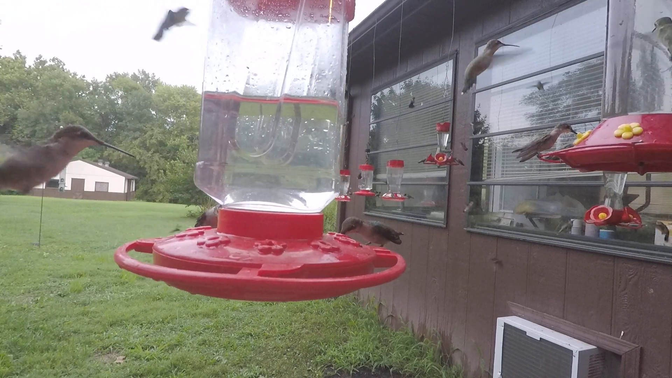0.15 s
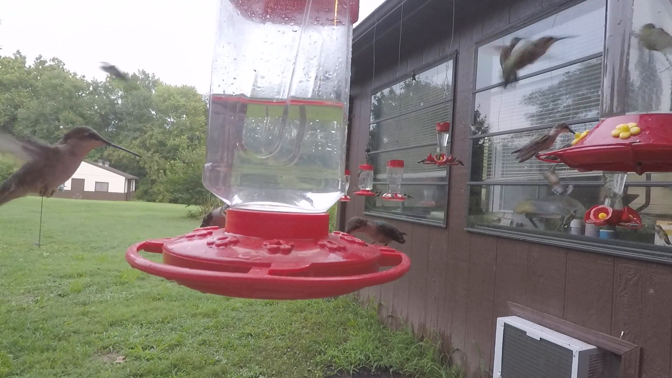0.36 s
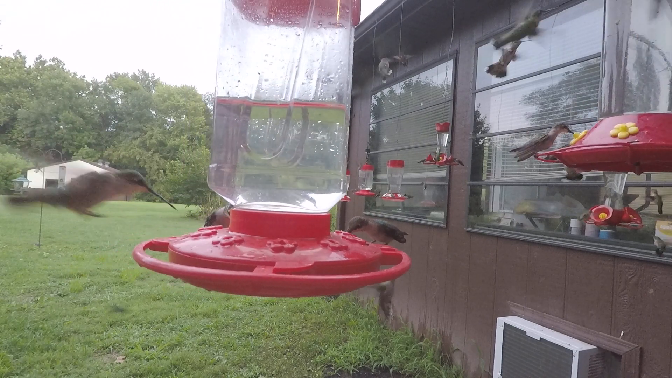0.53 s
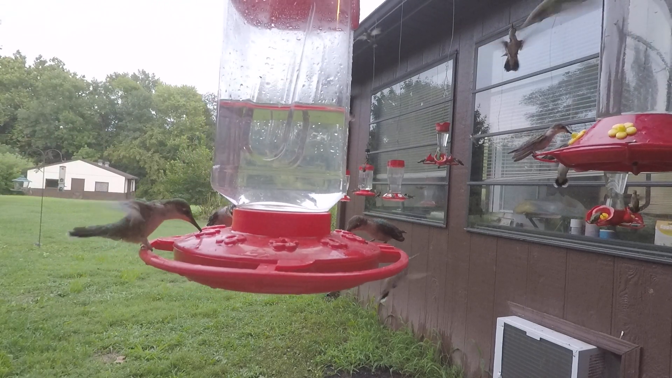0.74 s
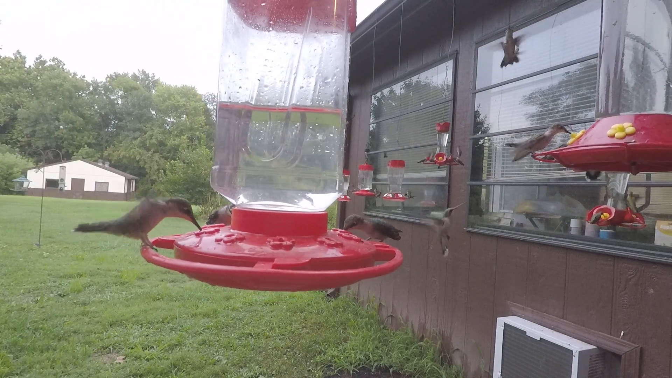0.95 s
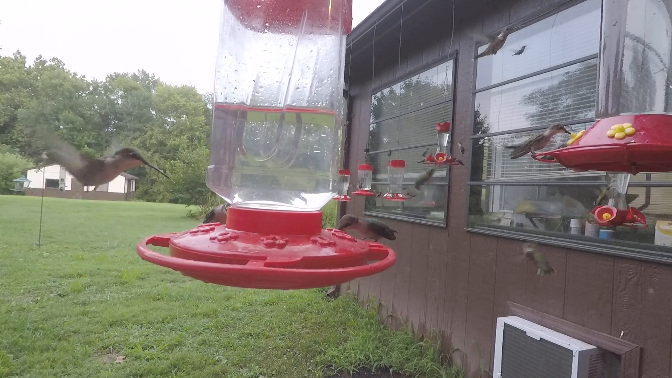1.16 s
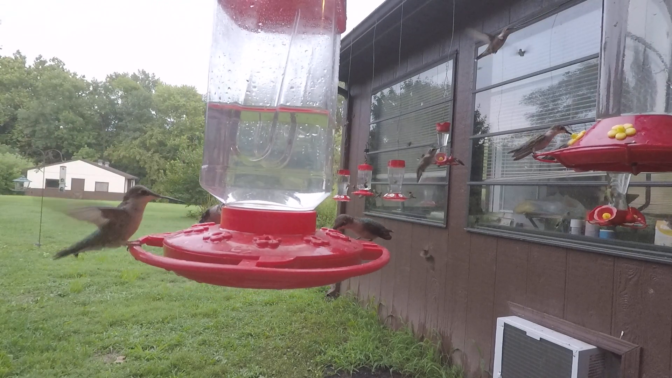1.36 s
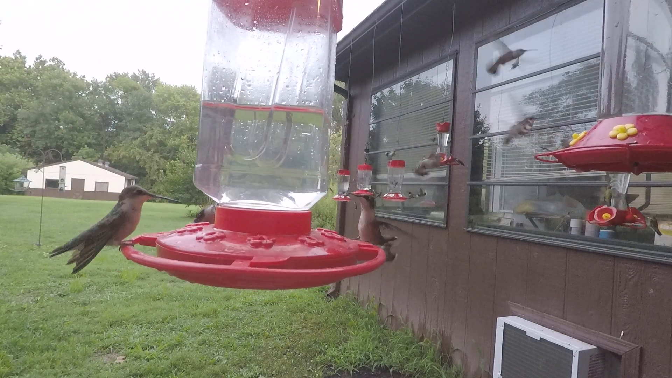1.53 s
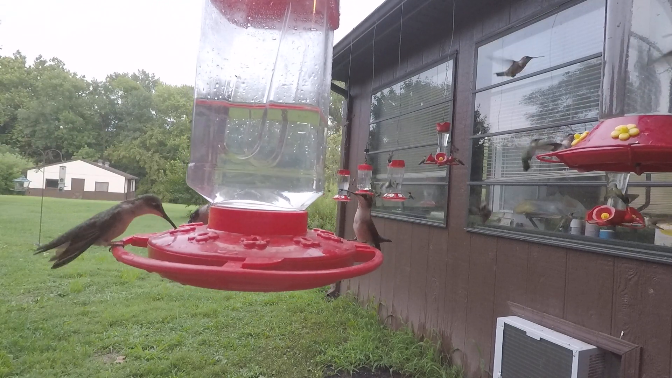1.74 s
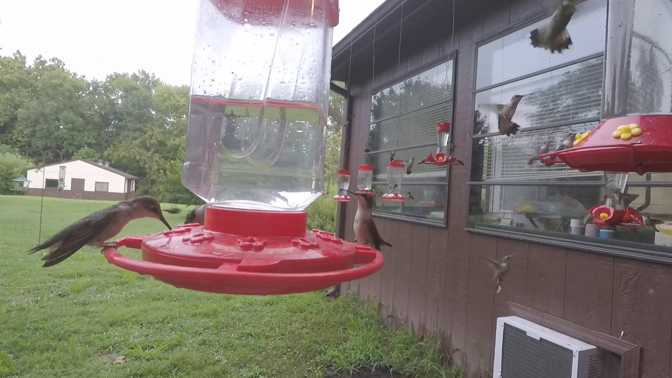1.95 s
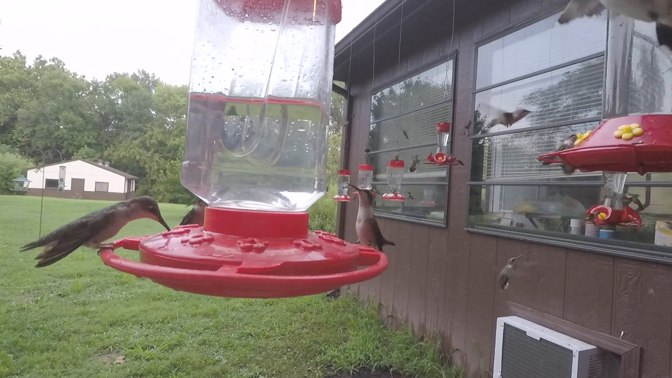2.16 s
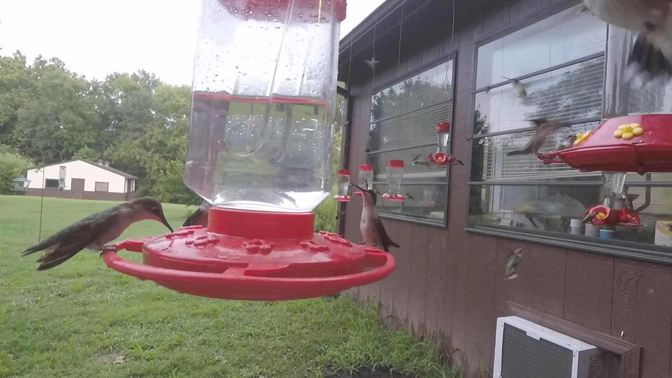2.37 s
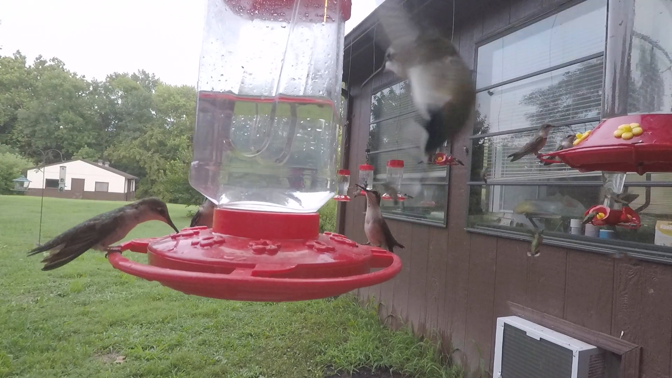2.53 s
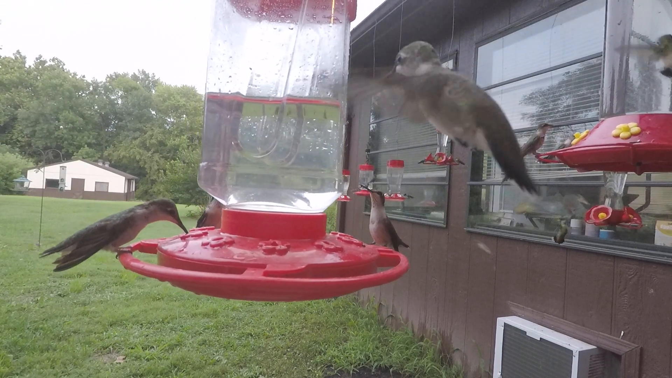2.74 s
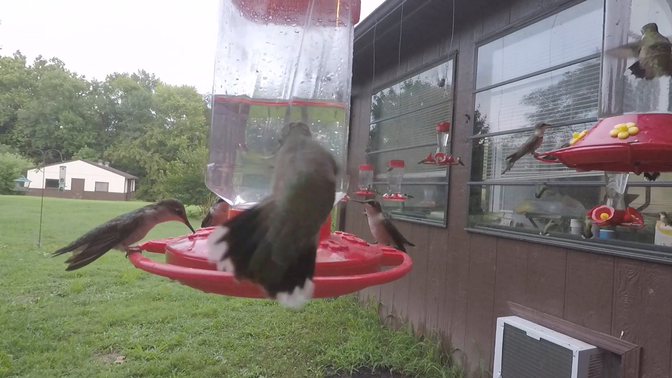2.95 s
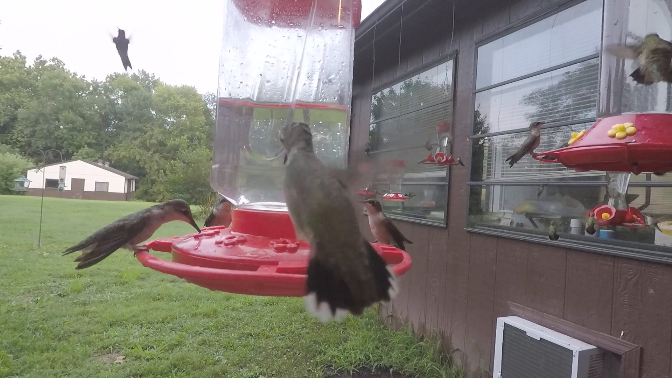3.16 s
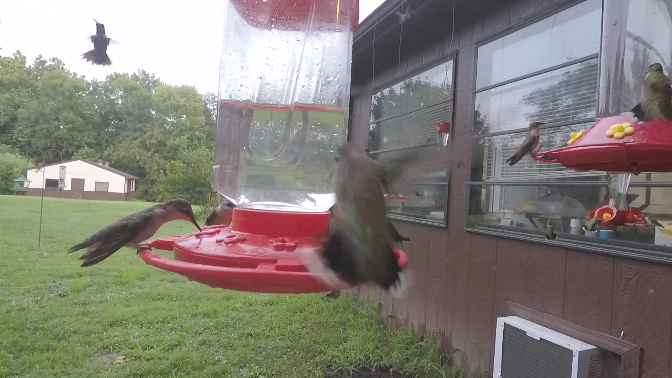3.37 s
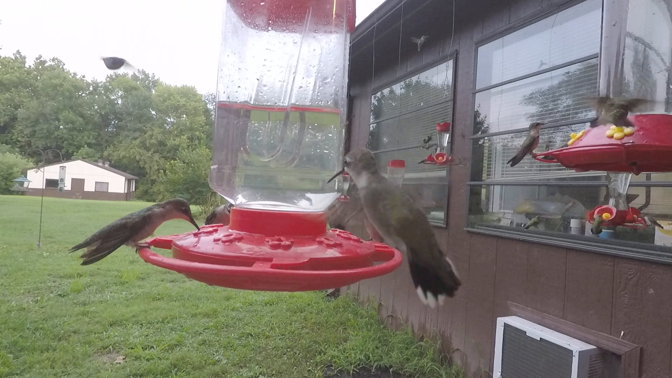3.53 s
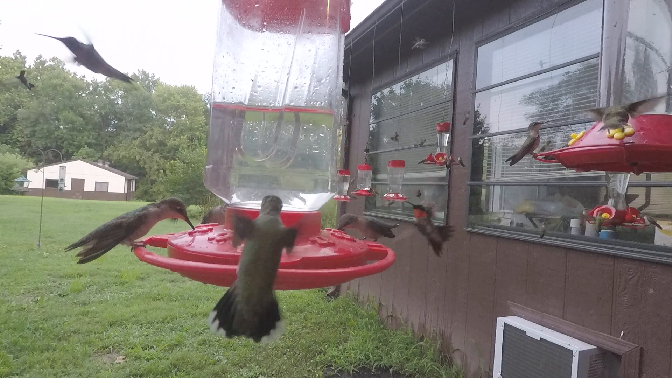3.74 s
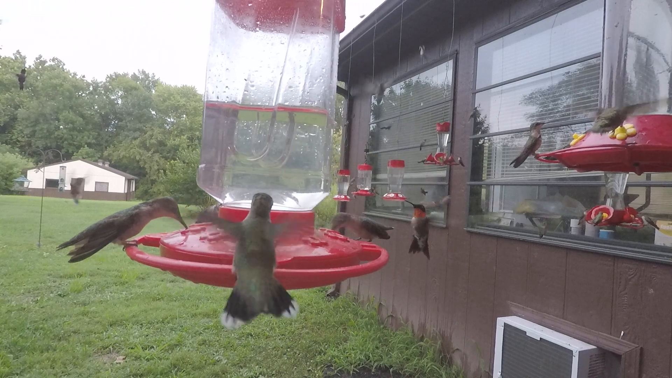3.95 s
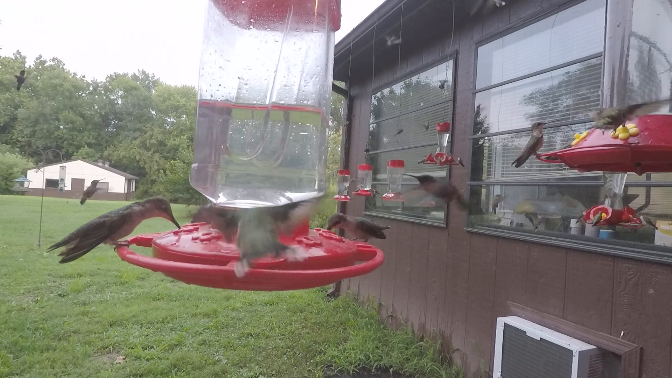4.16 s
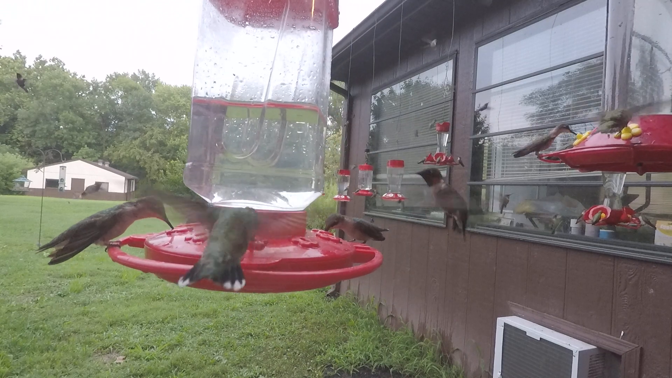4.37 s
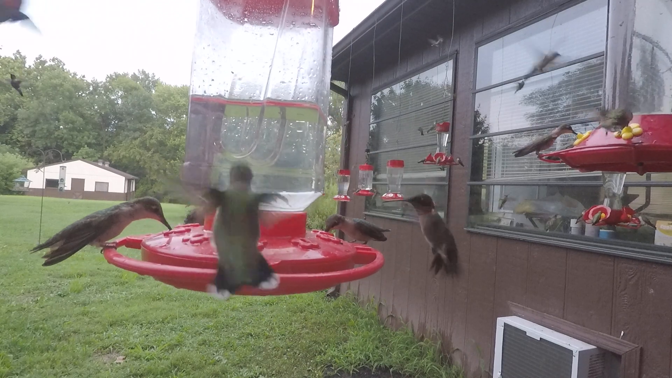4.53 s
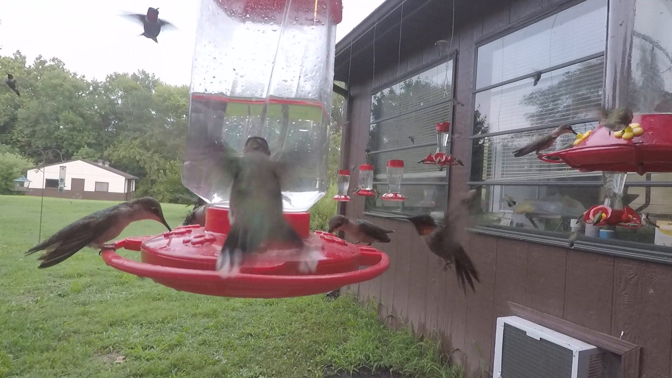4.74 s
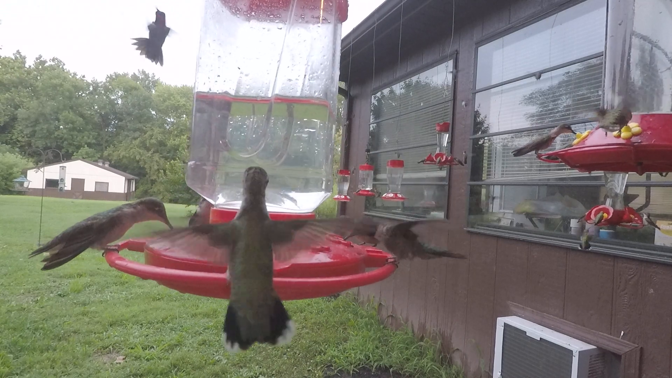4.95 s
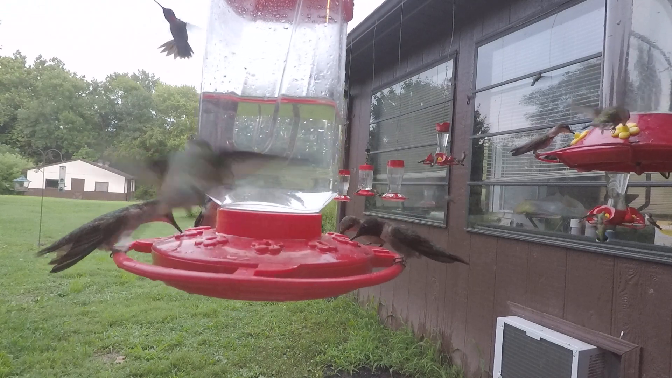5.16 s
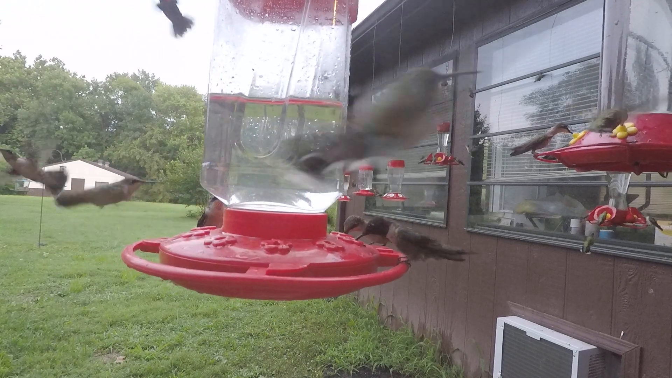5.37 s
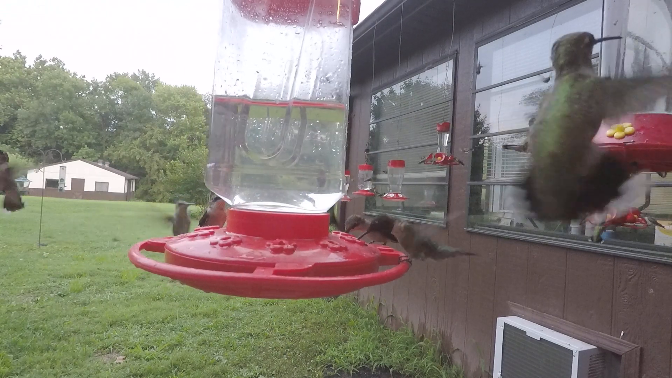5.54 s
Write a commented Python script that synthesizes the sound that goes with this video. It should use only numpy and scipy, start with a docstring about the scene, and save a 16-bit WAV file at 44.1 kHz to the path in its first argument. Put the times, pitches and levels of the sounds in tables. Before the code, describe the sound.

A crowd of hummingbirds at garden feeders beside a house. Fast, thin falling chips come in runs over a soft hum of many wings. Around two seconds squeals, a rasp and light clicks break out, then one bird hovers right by the microphone, its low wingbeats throbbing with puffs of air until the end. Faint insect trill and outdoor air stay behind.

```python
"""First comes a harsh rasp over the hum of many wings: hummingbirds crowd backyard feeders by a house wall.
Falling chips follow, and later thin squeals; throat filters shape stacks of overtones, and squeals are near sines.
From about two seconds on, the low throb of close wingbeats is heard: each is a thump with overtones,
and low noise is their downwash. Behind them is soft outdoor air noise with the trill of insects."""
import sys
import numpy as np
from scipy import signal
from scipy.fft import rfft, irfft, next_fast_len
from scipy.io import wavfile
from scipy.ndimage import uniform_filter1d, map_coordinates

SR = 44100
rng = np.random.default_rng(int(sys.argv[2]) if len(sys.argv) > 2 else 0)


def master_out(mix):
    """Clip the mix to full scale and print it as 16-bit PCM to the path in sys.argv[1]."""
    frames = np.transpose(np.atleast_2d(mix))
    ceiling = np.clip(frames, -1, 1)
    pcm = np.round(ceiling * 32767).astype(np.int16)
    wavfile.write(sys.argv[1], SR, pcm)


N = 246959
TIME = np.arange(N) / SR


def amp(db):
    """Turn decibels into gain."""
    return 10 ** (np.asarray(db) / 20)


def unit(x):
    """Scale to an rms level of 1."""
    return x / np.sqrt(np.mean(x ** 2) + 1e-20)


def clock(length):
    """Times in seconds of the samples in a short sound."""
    return np.arange(int(length * SR)) / SR


def turns(hz, rate=SR):
    """Phase in radians of a tone whose pitch may change from sample to sample."""
    return 2 * np.pi * np.cumsum(hz) / rate


def curves(rows):
    """Join each column of a table by straight lines in time."""
    s, *columns = np.transpose(rows)
    return [np.interp(TIME, s, column) for column in columns]


def weight(hz, points):
    """Gain of a spectrum table at the given frequencies."""
    f, db = np.transpose(points)
    return amp(np.interp(np.log(np.maximum(hz, 1)), np.log(f), db))


def colour(x, points):
    """Filter a sound by a spectrum table, then scale it to rms 1."""
    size = next_fast_len(x.shape[-1])
    hz = np.arange(size // 2 + 1) * SR / size
    filtered = irfft(rfft(x, size) * weight(hz, points), size)
    return unit(filtered[..., :x.shape[-1]])


def wander(rate, t=TIME):
    """Smooth chance with a spread near 1, changing about rate times a second."""
    knots = rng.standard_normal(size=4096)
    return map_coordinates(knots, [(t - t[0]) * rate], order=2, mode="wrap")


def place(x, pan_db, lag=0):
    """Make two channels: left minus right in dB, and the left one late by lag samples."""
    i = np.arange(len(x))
    left = np.interp(i - np.round(lag), i, x)
    return np.array([amp(pan_db / 2) * left, amp(-pan_db / 2) * x])


def add(out, s, x):
    """Mix a short stereo sound in at time s."""
    start = max(int(s * SR), 0)
    x = x[:, :max(N - start, 0)]
    out[:, start:start + x.shape[1]] += x


def swell(t, length, rise, fall):
    """Envelope of a note with rounded ends."""
    ramp = np.clip(np.minimum(t / rise, (length - t) / fall), 0, 1)
    return np.sin(np.pi / 2 * ramp) ** 2


def syrinx(t, hz, rough, flutter_rate):
    """Phase of the vibrating membrane in a bird's voice; roughness shakes its pitch."""
    return turns(hz * (1 + rough * wander(flutter_rate, t)))


# The throat's strong high resonance and weaker body. Each row: frequency in Hz, level in dB.
THROAT = [(3000, -24), (5000, -11.5), (6300, -0.5), (7800, 5), (9200, -2), (10400, -7.5), (11800, -30),
          (15000, -31)]
BODY = [(900, -17), (1500, 2), (2100, 2.5), (2900, -1), (5200, -12), (7000, -49)]


def voice(phase, hz, envelope, bright_db, body_db, throat=THROAT, hoarse=0):
    """Flickering overtones, with noise when hoarse, pass through a strong high resonance and a weaker body."""
    t = TIME[:len(phase)]
    stack = 0
    for k in range(1, 9):
        flicker = amp(3 * wander(220, t))
        below_limit = k * hz < SR / 2.5
        stack = stack + np.sin(k * phase) * flicker * below_limit
    source = envelope * (stack + hoarse * rng.standard_normal(len(t)))
    return amp(bright_db) * colour(source, throat) + amp(body_db) * colour(source, BODY)


def stutter(t, catch_hz=90.5):
    """Place within each catch of a strained voice, 0 to 1, at an uneven rate."""
    return np.cumsum(catch_hz * (1 + .2 * wander(60, t))) / SR % 1


# The wide open bill. Each row: frequency in Hz, level in dB.
OPEN_BILL = [(2500, -31), (3400, -4.5), (4700, -3.5), (6300, 1.5), (7600, 2.5), (9400, -1.5),
             (11300, -14.5), (14500, -26)]
# Each row: start in seconds, length in seconds, level of the bright overtones in dB, level of the body in dB.
RASPS = [(0, 0.017, -35, -46.5), (1.96, 0.092, -33, -53.5), (2.102, 0.064, -36.5, -53.5),
         (2.38, 0.058, -44.5, -62), (3.076, 0.11, -43, -78), (3.185, 0.12, -46, -54),
         (3.338, 0.034, -47, -62), (3.42, 0.039, -43.5, -72), (3.481, 0.097, -43, -80),
         (3.61, 0.048, -43.5, -65), (4.06, 0.08, -41.5, -72), (4.176, 0.054, -36.5, -54.5),
         (4.429, 0.06, -39.5, -57), (4.566, 0.049, -38, -50.5), (4.836, 0.024, -49, -54),
         (5.283, 0.14, -49, -60)]


def rasps(pitch_hz=3000, drop_octaves=.3, rough=.2, flutter_rate=1800, catch_db=2, pan_db=-4):
    """With the bill wide open, the membrane turns chaotic in dense, uneven bursts and the overtones smear."""
    out = np.zeros((2, N))
    for s, length, bright_db, body_db in RASPS:
        t = clock(length)
        hz = pitch_hz * 2 ** (-drop_octaves * t / length)
        bursts = amp(4.2 * wander(1100, t) - catch_db * stutter(t))
        envelope = swell(t, length, .27 * length, .5 * length) * bursts
        phase = syrinx(t, hz, rough, flutter_rate)
        note = voice(phase, hz, envelope, bright_db, body_db, OPEN_BILL)
        add(out, s, place(note, pan_db, lag=5))
    return out


# Spectrum of the flock's hum. Each row: frequency in Hz, level in dB.
HUM = [(40, -46), (112, -28), (142, 2), (190, 0), (260, -7), (350, -10), (480, -14), (700, -26),
       (1100, -27.5)]
# The rest of the flock. Each row: time in seconds, level of the hum in dB.
FLOCK = [(0, -35), (2, -35.5), (2.3, -35), (2.55, -34), (3.3, -35), (4.3, -36), (5.6, -32.5)]


def flock(count=6, slow_hz=41, fast_hz=58, pan_db=-1.75):
    """The hum of the flock's wingbeats, made of overtones only, swells and wavers."""
    out = 0
    t = TIME[::8]  # the hum is low, so an eighth of the sample rate will do
    lags = np.linspace(-3, 4, count)  # spread from side to side
    for beat_hz, lag in zip(np.linspace(slow_hz, fast_hz, count), lags):
        hz = beat_hz * (1 + .055 * wander(4, t) + .01172 * wander(35, t))
        phase = turns(hz, SR / 8)
        hum = 0
        for k in range(2, 19):
            hum = hum + weight(k * hz, HUM) * np.sin(k * phase + rng.uniform(0, 2 * np.pi))
        out = out + place(hum * amp(3.04 * wander(4.5, t)), pan_db, lag)
    out = signal.resample_poly(out, 8, 1, axis=1)[:, :N]
    # even out the level over a quarter of a second, so that the table sets it
    loudness = np.sqrt(uniform_filter1d(np.mean(out ** 2, axis=0), size=SR // 4))
    return out / loudness * amp(curves(FLOCK)[0])


# The garden air with its insect choir. Each row: frequency in Hz, level in dB.
AIR = [(30, 6), (450, 2), (1000, 2.5), (1900, -0.5), (3000, -5), (4700, -7.5), (6300, 1.5), (6900, -1),
       (7600, -1), (9400, -3.5), (11500, -18.5), (15000, -24.5)]


def garden(air_db=-46.5, trill_hz=9400, sag_hz=480, trill_db=-59):
    """Noise makes soft air and a steady insect choir; one high trill sags in pitch three times a second."""
    noise = rng.standard_normal((2, N)) + .14 * rng.standard_normal(N)  # the second part is in both channels
    air = amp(air_db + wander(6.8)) * colour(noise, AIR)
    cycle = ((TIME - .21) / .337) % 1
    phase = turns(trill_hz - sag_hz * cycle)
    trill = np.array([unit(wander(350) * np.cos(phase + 2 * wander(350))) for _ in range(2)])
    return air + amp(trill_db) * trill * swell(cycle, .85, .59, .051)


def chip(start_hz, slide, bright_db, body_db, length, attack, release, rough, hold, hoarse):
    """A short stack of overtones holds, then slides down, starting clean and turning hoarse and scratchy."""
    t = clock(length)
    age = t / length
    hz = start_hz * 2 ** (-slide * t * (2 * age) ** hold)
    flicker = amp(2.2 * (.5 + age) * wander(700, t))
    envelope = swell(t, length, attack, release) * flicker
    phase = syrinx(t, hz, rough * (.16 + 3.97 * age ** 2), 1404)
    return voice(phase, hz, envelope, bright_db, body_db, hoarse=hoarse * age)


# Notes mostly in runs that slow down and fade. Each row: start in seconds, starting pitch in Hz,
# fall in octaves per second (averaged up to mid-note), level of the bright overtones in dB, level of the body in dB.
CHATTER = [(.074, 2216, 15, -37, -79), (.136, 2240, 13, -36.5, -59), (.204, 2204, 11.6, -38, -56),
           (.266, 2235, 18.6, -37.5, -51), (.356, 2210, 13, -38.5, -54.5), (.443, 2260, 13, -42.5, -59),
           (2.198, 2346, 16, -35, -58), (2.263, 2330, 24, -34, -61), (2.328, 2316, 23, -37.5, -52),
           (2.412, 2310, 16, -40, -51), (2.473, 2250, 31, -40.5, -59), (2.529, 2186, 24, -39.5, -59),
           (2.6, 2174, 22, -39, -54.5), (2.677, 2105, 20.5, -39, -58), (2.753, 2129, 20, -40.5, -66),
           (2.839, 2045, 20, -43, -56.5), (2.905, 2070, 19, -46, -75), (3.616, 1938, 10.03, -55, -51.5),
           (3.638, 2562, 17.6, -40, -47), (4.266, 2598, 10.3, -38, -54), (4.325, 2470, 8, -39.5, -57),
           (4.435, 2160, 13.3, -36.5, -51.5), (4.462, 2096, 13.5, -43.5, -53),
           (4.663, 2571, 8.4, -38.5, -58), (5.158, 2603, 21, -44, -66), (5.563, 1980, 14, -41, -52)]


def chatter(length=.033, attack=.0067, release=.023, rough=.06, pan_db=-4):
    """Thin, bright notes break up as the membrane's pitch falls."""
    out = np.zeros((2, N))
    for s, hz, slide, bright_db, body_db in CHATTER:
        note = chip(hz, slide, bright_db, body_db, length, attack, release, rough, hold=.465, hoarse=3.2)
        add(out, s, place(note, pan_db, lag=2))
    return out


# Single sharp chips, near and far. Each row: start in seconds, starting pitch in Hz,
# level of the bright overtones in dB, level of the body in dB.
CHIPS = [(0.181, 2430, -39.5, -48.5), (.246, 2240, -54, -55), (0.316, 2370, -39, -48.5),
         (.342, 2190, -60, -52.5), (0.721, 2550, -49, -54), (.792, 2215, -48, -59),
         (0.811, 2296, -44, -49.5), (0.923, 2370, -46.5, -66), (.983, 2494, -40.5, -46.5),
         (1.076, 2394, -43, -59), (1.373, 2425, -47, -57), (1.427, 2500, -48, -52.5),
         (1.519, 2595, -44, -48.5), (2.953, 2352, -54, -55), (3.055, 2420, -44, -55),
         (3.14, 2193, -47, -57), (3.692, 2160, -48, -51.5), (4.292, 2233, -58, -53.5),
         (4.74, 2650, -43, -55), (5.365, 2304, -55, -52)]


def chips(slide=37, length=.0272, attack=.0034, release=.019, rough=.039, pan_db=-3):
    """Lone notes have a quick attack, a steep fall and a fuller body."""
    out = np.zeros((2, N))
    for s, hz, bright_db, body_db in CHIPS:
        note = chip(hz, slide, bright_db, body_db, length, attack, release, rough, hold=.16, hoarse=1.4)
        add(out, s, place(note, pan_db, lag=2))
    return out


def far_chips(count=46, length=.025, pitch_hz=2300, slide=30, bright_db=-57, body_db=-59):
    """Birds at the other feeders chip at random, each with its own pitch, level and side."""
    out = np.zeros((2, N))
    t = clock(length)
    for when, size, pitch, side in rng.uniform(-.9, 1, (count, 4)):
        hz = pitch_hz * (1 + .12 * pitch) * 2 ** (-slide * t)
        envelope = swell(t, length, length / 2, length / 2)
        note = voice(syrinx(t, hz, .042, 743), hz, envelope, bright_db, body_db)
        add(out, (when + 1) / 2 * N / SR, place(note * amp(2 * size), 2 * side, lag=10 * side))
    return out


def wingbeat(beat_hz, stroke, jitter, dart_db, twist):
    """One pressure pulse a beat, no two alike; overtones shift as the wings twist and the bird darts."""
    phase = turns(beat_hz * (1 + jitter * wander(22)))
    pulse = 0
    for k, db in stroke:
        gain = amp(db + min(k, 2) * wander(20))
        pulse = pulse + gain * np.cos(k * phase + twist * (k - 1) * wander(14))
    return unit(pulse * amp(dart_db * wander(13)))


# The nearest bird's wingbeat. Each row: multiple of the beat rate, average level in dB.
STROKE = [(1, 8), (2, -11), (3, -7), (4, -20.5), (6, -22), (7, -22.5), (9, -26.5)]
# Its fifth overtone, a clear drone, heard briefly near 1.9 s and steadily from 2.5 to 3.5 s.
# Each row: time in seconds, level in dB.
DRONE = [(1.8, -62), (1.9, -37.5), (2.04, -36.5), (2.35, -50.5), (2.53, -35), (3.5, -35.5), (3.75, -48)]
# Its hovering. Each row: time in seconds, average wingbeats per second, level of the beats in dB.
HOVER = [(2.0, 40.3, -48), (2.46, 39, -44), (2.52, 47, -27), (2.82, 37.2, -33), (2.92, 45.8, -22),
         (3.03, 42.5, -25), (3.38, 43.2, -21.5), (3.59, 41.3, -27.5), (3.74, 46.8, -22),
         (3.98, 45.6, -26.5), (4.1, 46.9, -26.5), (4.94, 46.1, -23.5), (5.1, 47.7, -25), (5.6, 39, -22.5)]


def bass_entry():
    """The low wing sound fades in over a quarter of a second."""
    return np.clip((TIME - HOVER[0][0]) * 4, 0, 1)


def nearest_bird(whirr_db=-10.5, early_db=6, ease_s=.47, jostle_s=3.7, closest_db=-25, carry=.57):
    """Wingbeats throb; the low thump dies off fast with distance, the whirr of overtones more slowly."""
    beat_hz, near_db = curves(HOVER)
    jostled = np.clip((TIME - jostle_s) * 2, 0, 1)  # jostled at the feeder, its beat wavers more
    beats = wingbeat(beat_hz, STROKE, jitter=.02 + .0798 * jostled, dart_db=1.4 + 1.2 * jostled, twist=.35)
    thump = signal.sosfiltfilt(signal.butter(3, 105, fs=SR, output="sos"), beats)
    # the overtones are strongest at first, then ease
    easing = np.exp(-np.maximum(TIME - HOVER[2][0], 0) / ease_s)
    # carry is the share of the distance loss in dB that the overtones suffer
    overtone_db = closest_db + carry * (near_db - closest_db) + whirr_db + early_db * easing
    whirr = unit(beats - thump) * amp(overtone_db)
    drone = wingbeat(beat_hz, [(5, 0)], jitter=.008, dart_db=.5, twist=.08) * amp(curves(DRONE)[0])
    return place(bass_entry() * (thump * amp(near_db) + whirr) + drone, -1.4, lag=4)


# Spectrum of the downwash. Each row: frequency in Hz, level in dB.
WASH = [(22, 4), (65, 14.5), (150, 4), (400, -20.5), (1200, -59)]


def downwash(wash_db=-5):
    """Air pushed down by the nearest wings buffets the microphone as low noise."""
    near_db = curves(HOVER)[1]
    noise = rng.standard_normal(N) + .77 * rng.standard_normal((2, N))  # the first part is in both channels
    return bass_entry() * colour(noise, WASH) * amp(near_db + wash_db + 2 * wander(9))


# The second bird's wingbeat. Each row: multiple of the beat rate, average level in dB.
RIVAL_STROKE = [(2, 14.5), (3, 4), (4, -7.5), (5, -4), (6, -6)]
# Its jostling for the feeder. Each row: time in seconds, average wingbeats per second, level in dB.
RIVAL = [(2.3, 41.4, -40.5), (4.3, 48, -29), (5.0, 48.7, -39.5), (5.15, 46, -23), (5.26, 55.8, -28),
         (5.31, 47.6, -16), (5.36, 41, -23.5), (5.42, 45, -19.5), (5.6, 39, -28.5)]


def rival_bird():
    """A second bird jostles for the feeder; overtones of its wingbeat throb without the base tone."""
    beat_hz, level_db = curves(RIVAL)
    beats = wingbeat(beat_hz, RIVAL_STROKE, jitter=.04, dart_db=1.8, twist=.6)
    return bass_entry() * place(beats * amp(level_db), -.45, lag=-22)


# Each row: start in seconds, length in seconds, pitch in Hz, glide over the note in Hz,
# level in dB before a common lift of 1 dB, roughness from 0 to 1.
SQUEALS = [(1.875, 0.065, 6030, 376, -31.5, 0.01), (1.943, 0.044, 6300, -250, -29, 0.04),
           (2.145, 0.062, 7390, 182, -29, 0.01), (2.7, .032, 5600, 80, -43, 0.03),
           (2.964, 0.03, 6470, 60, -42.5, 0.03), (2.988, 0.058, 6630, -33, -37.5, .01),
           (3.079, 0.063, 6670, -100, -41.5, 0.03), (3.486, 0.068, 6550, -26, -40, 0.01),
           (3.986, 0.03504, 6270, 30, -38.5, 0.01), (4.01, 0.024, 6980, 500, -34.5, 0),
           (4.034, 0.077, 7200, -300, -38, 0.04), (4.412, 0.056, 6700, -150, -39.5, 0.06),
           (4.68, .089, 7130, 70, -31, 0)]


def squeals(gain_db=1, octave_db=-26, breakup=9, scoop=55, arch_hz=47, pan_db=-3):
    """Thin, nearly pure whistles; rough ones scoop up in pulses and hiss as they break into a rasp."""
    out = np.zeros((2, N))
    for start, length, pitch_hz, glide_hz, db, rough in SQUEALS:
        t = clock(length)
        hz = pitch_hz + glide_hz * t / length + arch_hz * np.sin(np.pi * t / length)  # arches in mid-note
        scooped_hz = hz * (1 - scoop * rough ** 2 * np.exp(-5 * stutter(t)))
        phase = syrinx(t, scooped_hz, rough, 1140)
        flutter = amp((1 + 25 * rough) * wander(260, t))
        envelope = amp(db) * flutter * swell(t, length, .0059, .24 * length)
        tone = np.sqrt(2) * (np.sin(phase) + amp(octave_db) * np.sin(2 * phase))
        hiss = breakup * rough * colour(rng.standard_normal(len(t)), OPEN_BILL)
        add(out, start, place(envelope * (tone + hiss), pan_db, lag=19))
    return amp(gain_db) * out


# Small clicks of jostling birds. Each row: start in seconds, starting level of the ring in dB, ring in Hz.
TICKS = [(2.067, -37.5, 2600), (2.0763, -40, 1650), (2.0883, -37.5, 2480)]


def ticks(decay_s=.0027, crack=.89):
    """Light, dry clicks: a tone and a crack of noise die away within a few cycles."""
    out = np.zeros((2, N))
    t = clock(10 * decay_s)
    for s, db, hz in TICKS:
        noise = crack * colour(rng.standard_normal(len(t)), BODY)
        ring = (np.sin(2 * np.pi * hz * t) + noise) * np.exp(-t / decay_s)
        add(out, s, place(amp(db) * ring, 0))
    return out


def wall(x, wet_db, t60=.09, gap_s=.0038):
    """Feeders, eaves and house wall scatter a brief echo, different in each channel."""
    t = np.arange(SR // 4) / SR
    # t60 is the time in seconds to fall by 60 dB; the echo starts after the gap
    echo = rng.standard_normal((2, len(t))) * amp(-60 * t / t60) * np.clip(t / gap_s - 1, 0, 1)
    echo /= np.sqrt(np.sum(echo ** 2, axis=1, keepdims=True))
    return x + amp(wet_db) * signal.fftconvolve(x, echo, axes=1)[:, :N]


def scene():
    """Calls and clicks with their echo, the wings, and the garden."""
    calls = wall(rasps() + chatter() + chips() + far_chips() + ticks(), wet_db=-6)
    whistles = wall(squeals(), wet_db=-10)
    wings = flock() + nearest_bird() + downwash() + rival_bird()
    return calls + whistles + wings + garden()


def record(dry, top_hz=14700):
    """A steep filter cuts the extreme treble; the sound starts and ends softly."""
    soft = dry * swell(TIME, N / SR, .002, .005)
    return signal.sosfilt(signal.ellip(8, .2, 70, top_hz, fs=SR, output="sos"), soft)


dry = scene()
out = record(dry)
master_out(out)
```